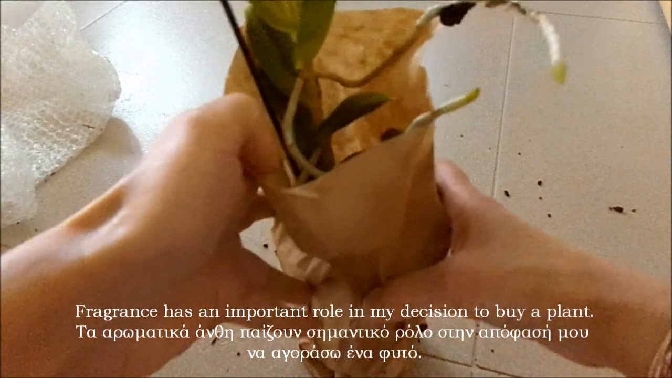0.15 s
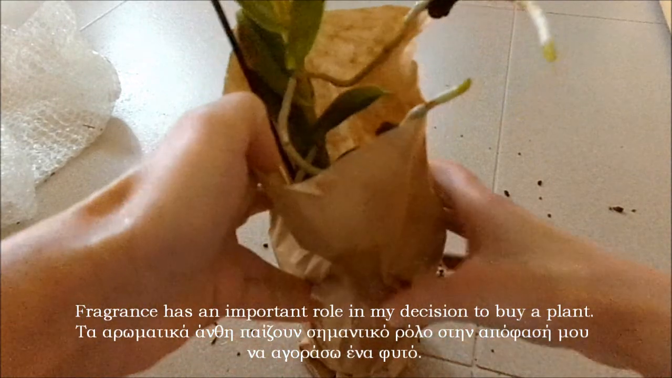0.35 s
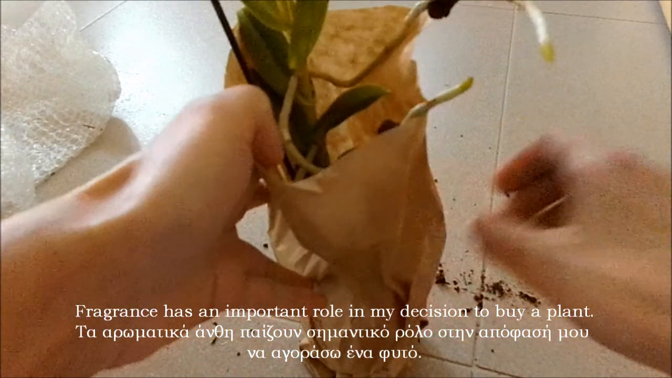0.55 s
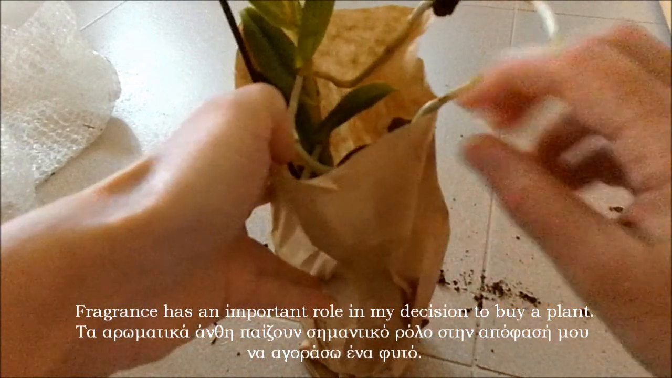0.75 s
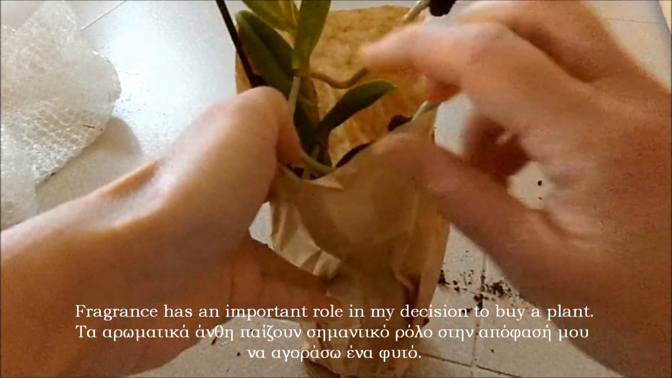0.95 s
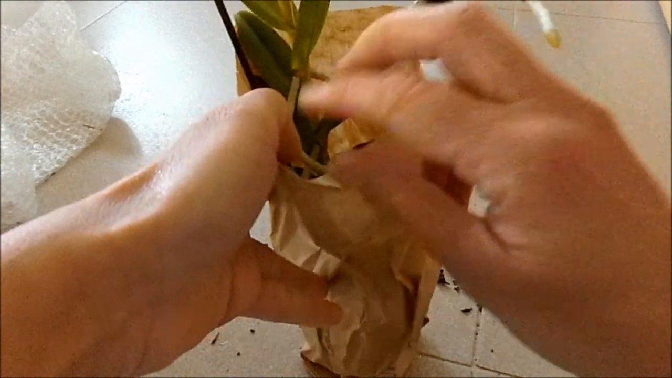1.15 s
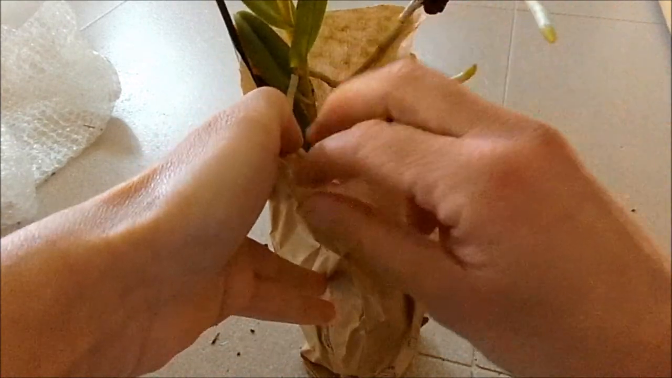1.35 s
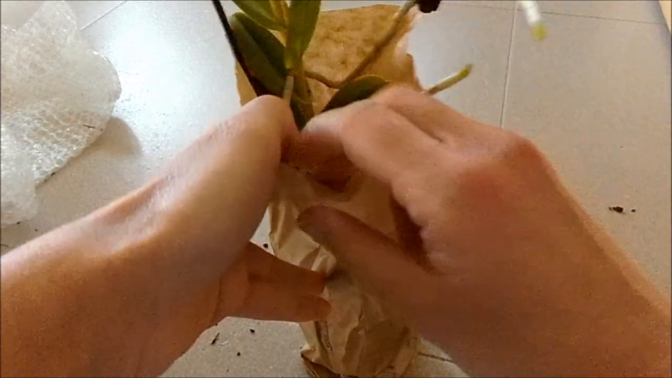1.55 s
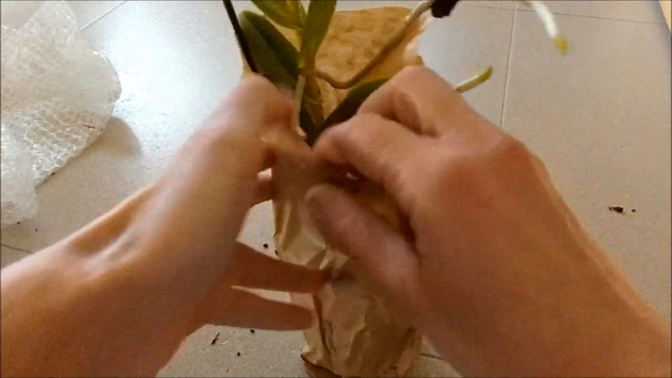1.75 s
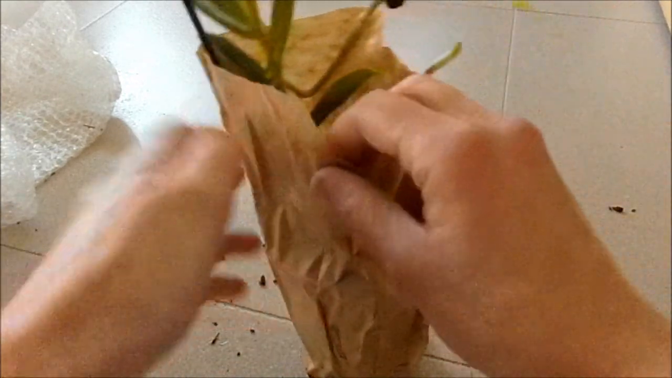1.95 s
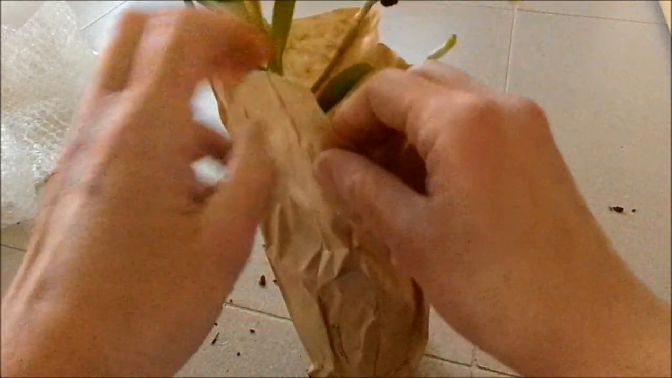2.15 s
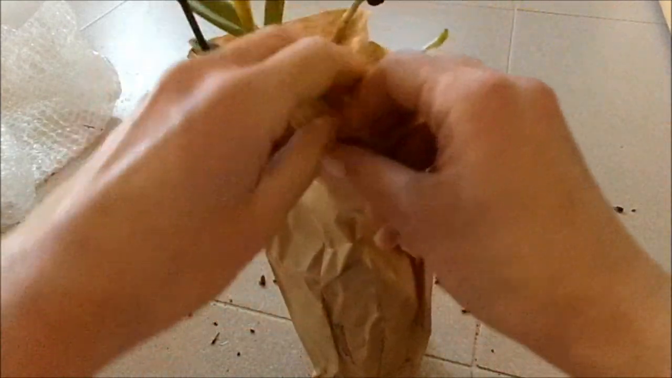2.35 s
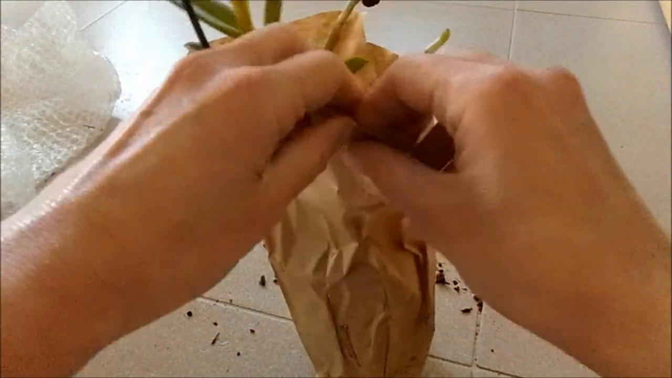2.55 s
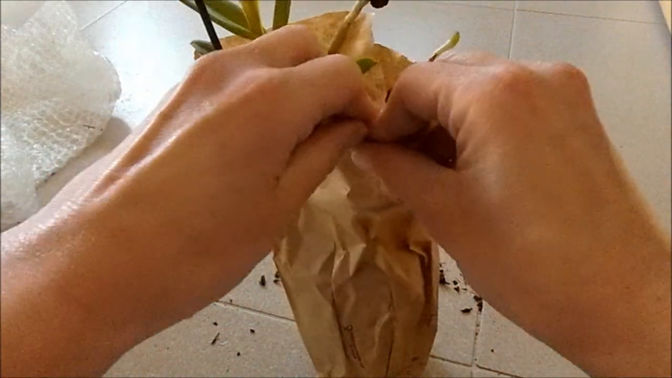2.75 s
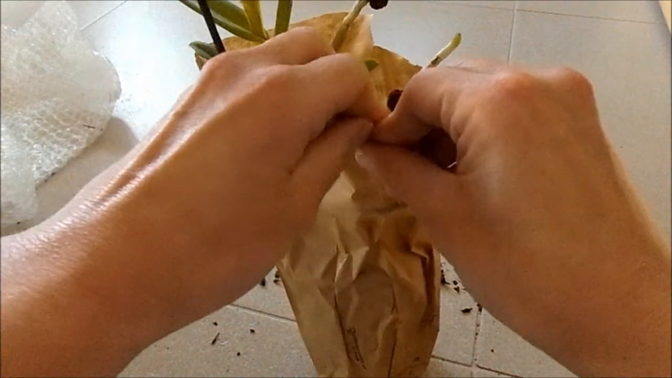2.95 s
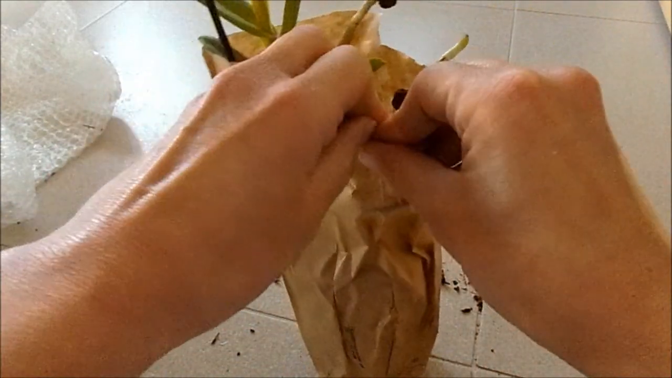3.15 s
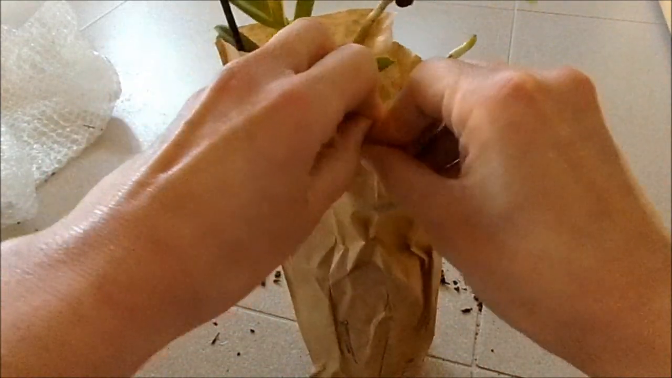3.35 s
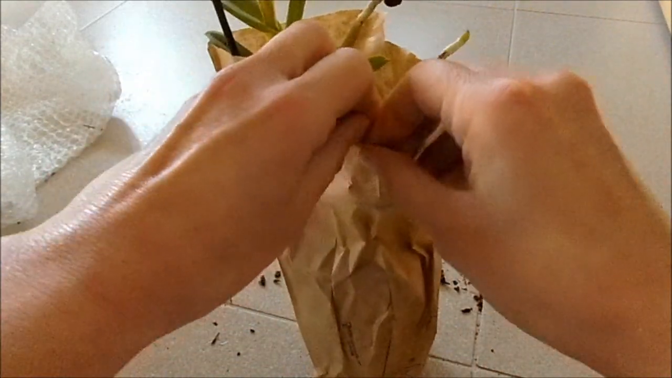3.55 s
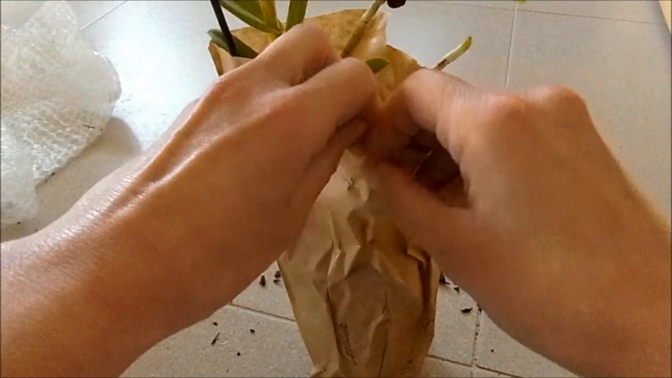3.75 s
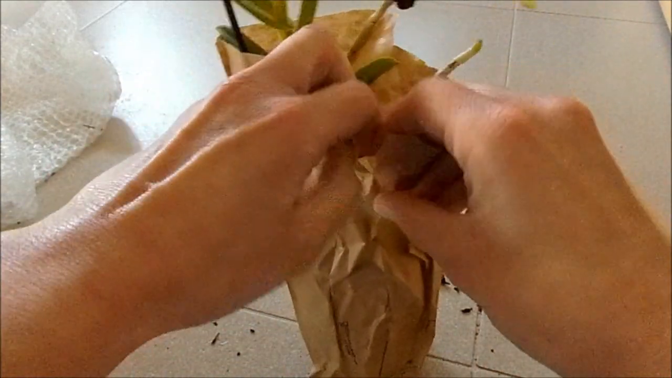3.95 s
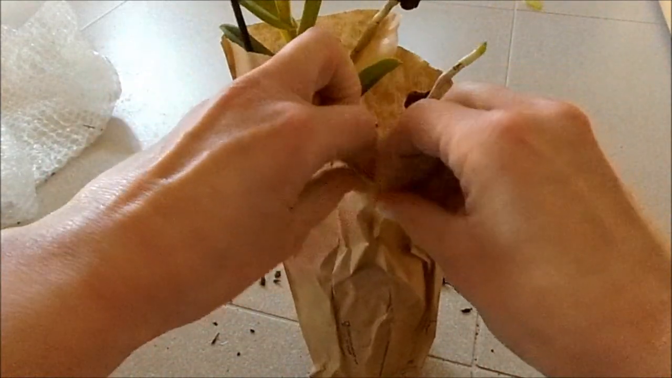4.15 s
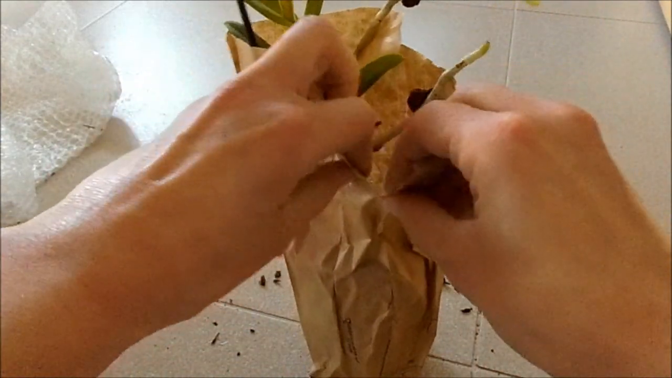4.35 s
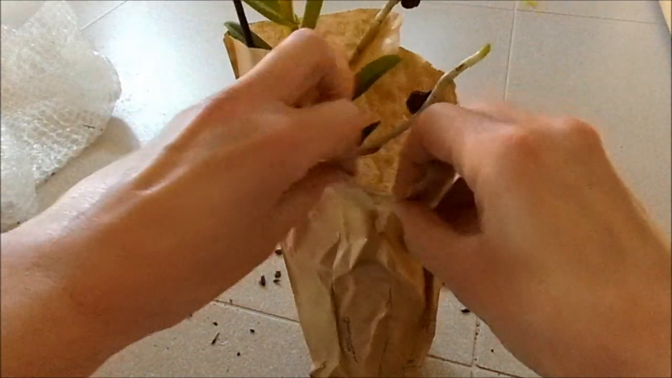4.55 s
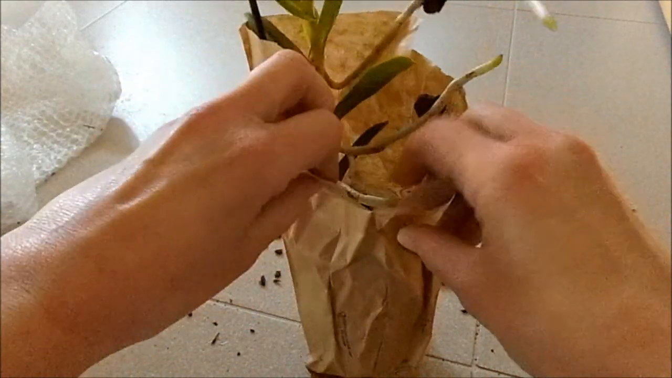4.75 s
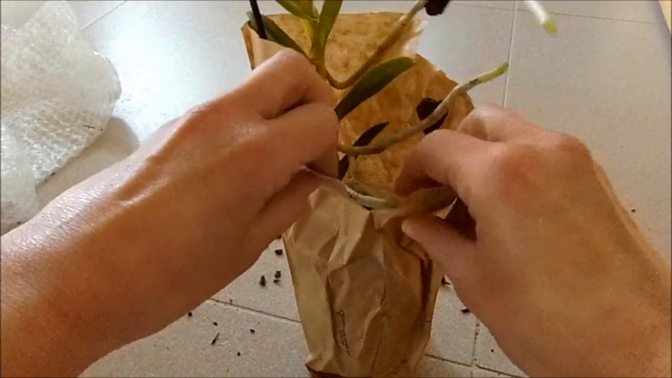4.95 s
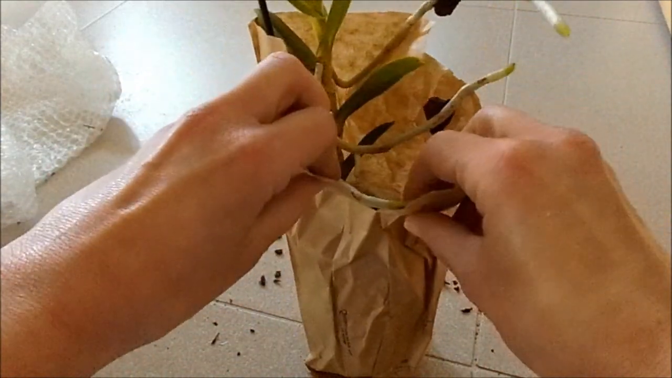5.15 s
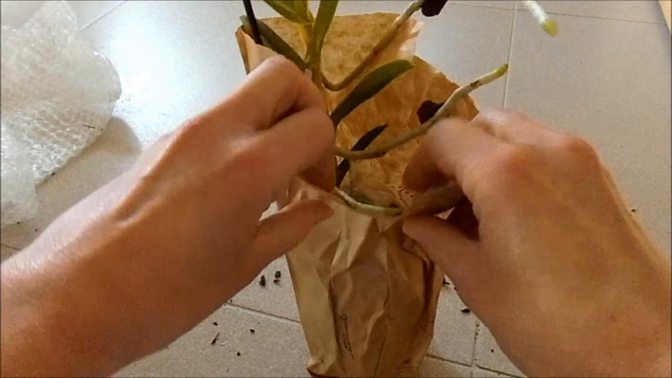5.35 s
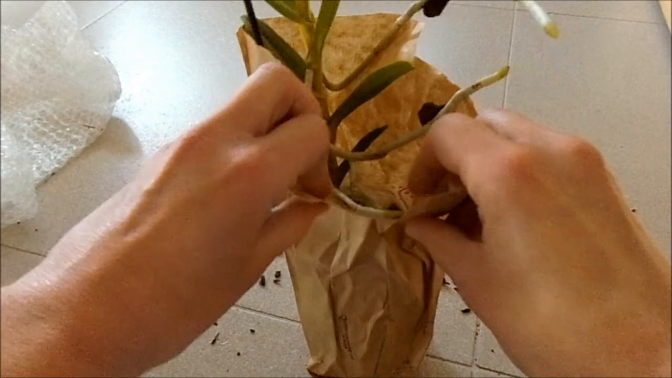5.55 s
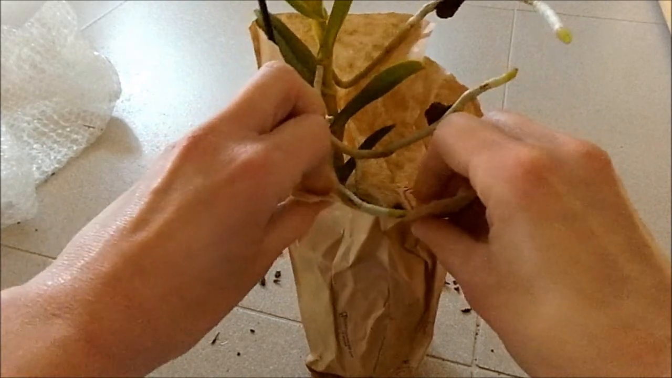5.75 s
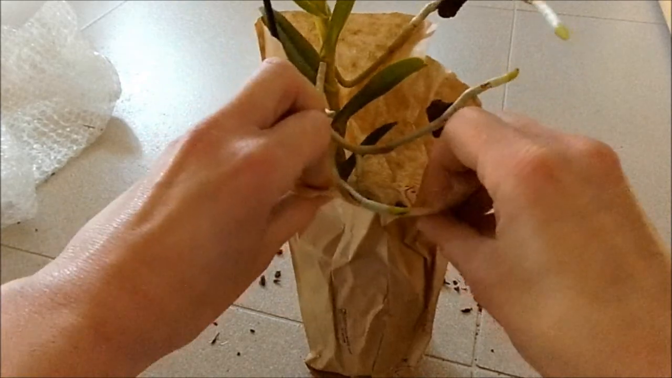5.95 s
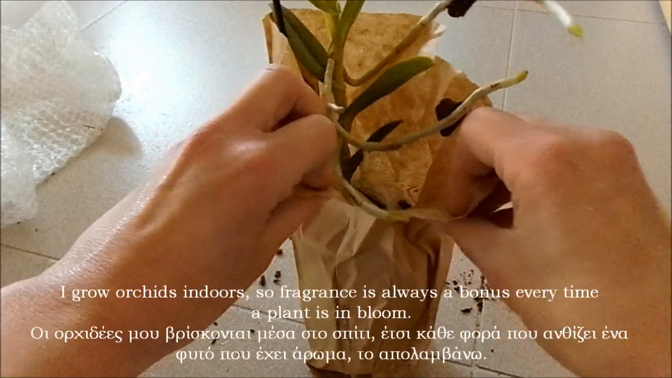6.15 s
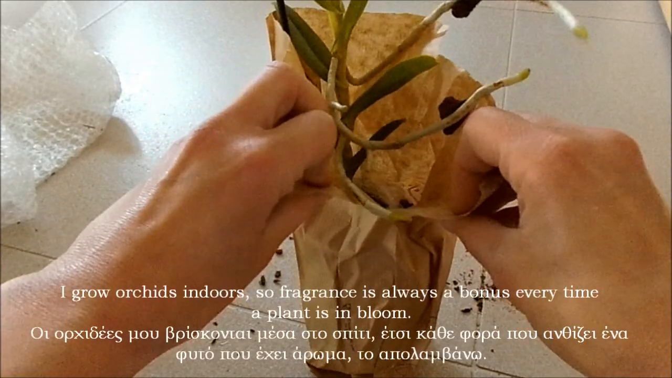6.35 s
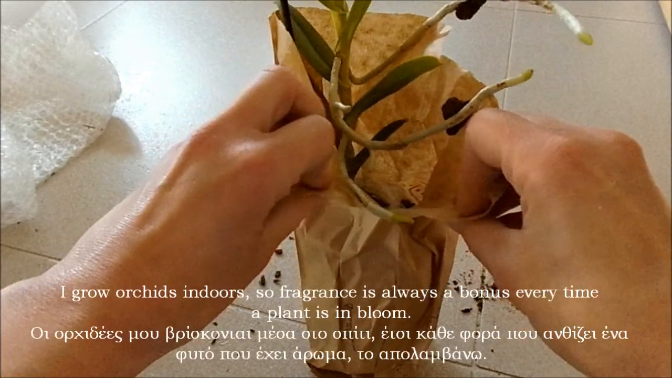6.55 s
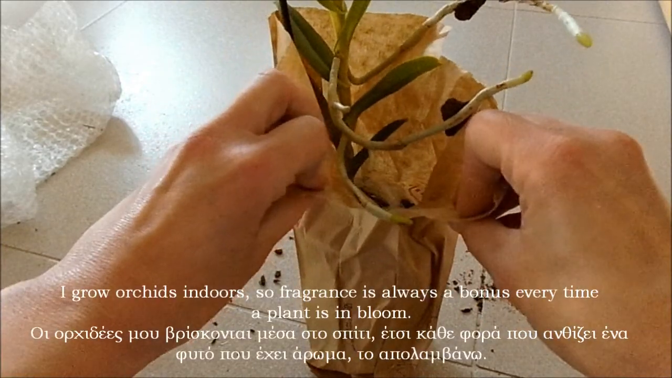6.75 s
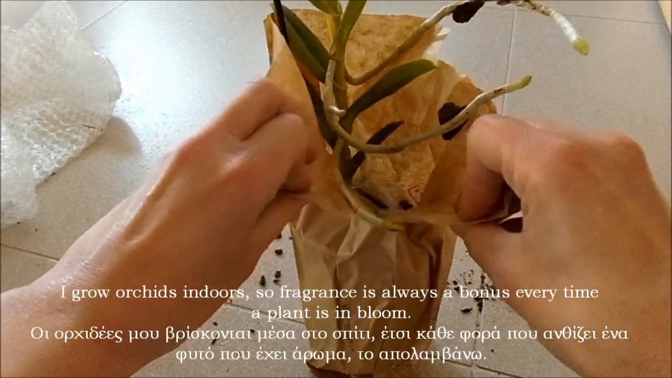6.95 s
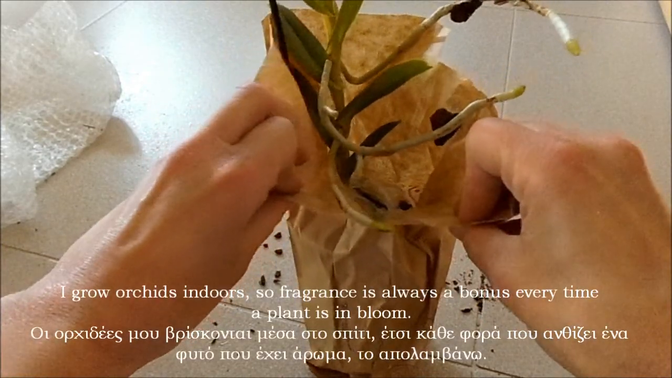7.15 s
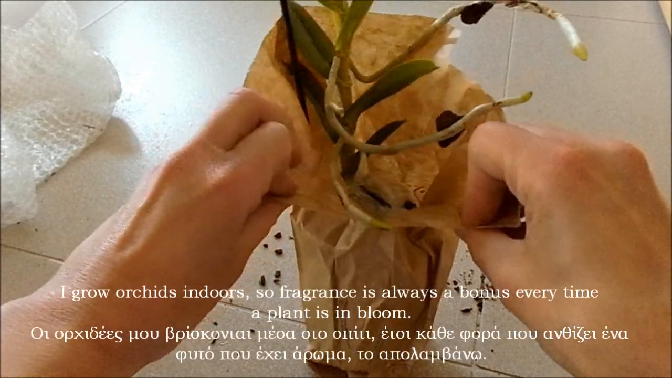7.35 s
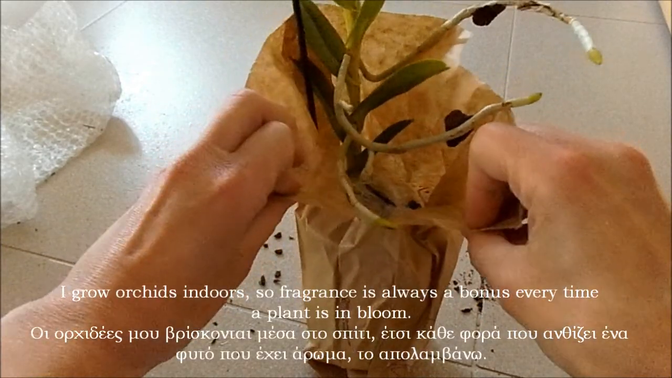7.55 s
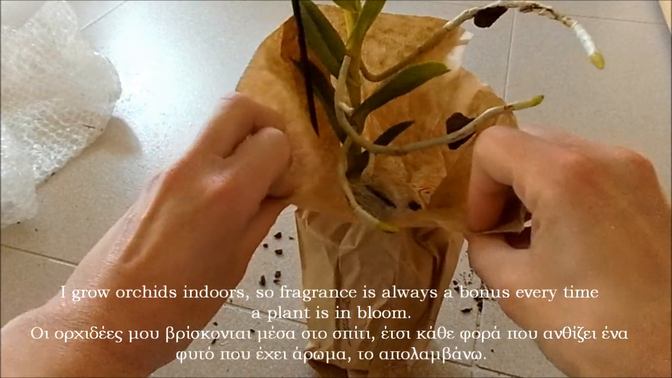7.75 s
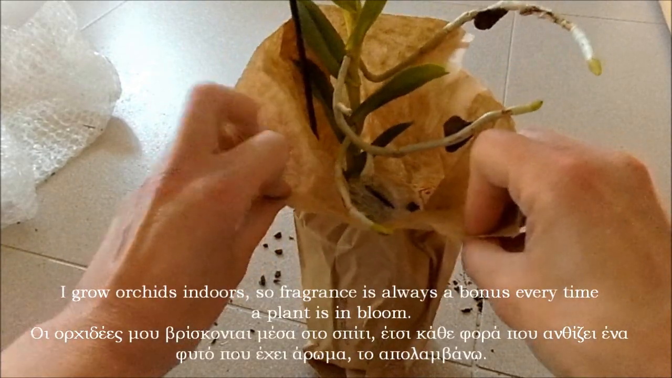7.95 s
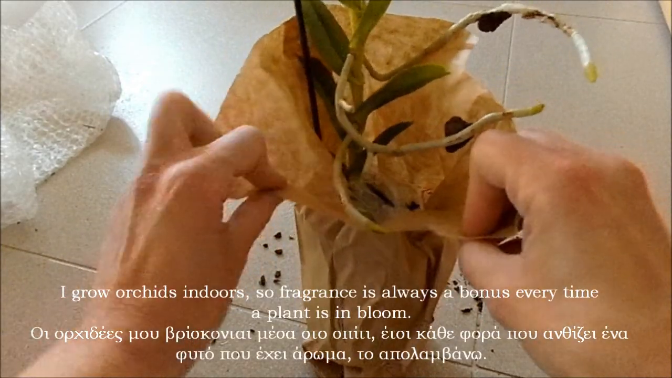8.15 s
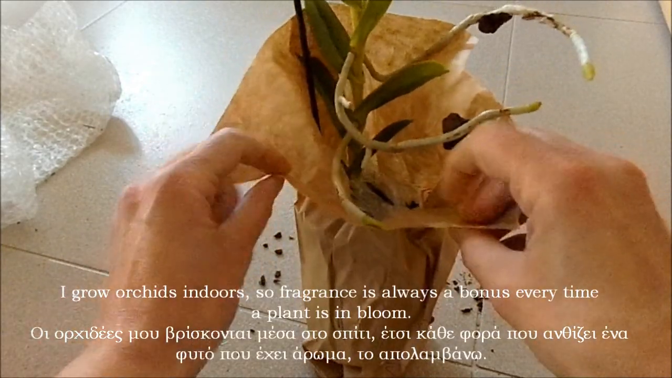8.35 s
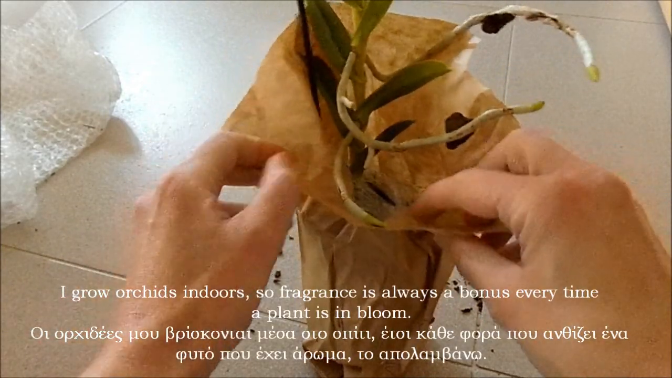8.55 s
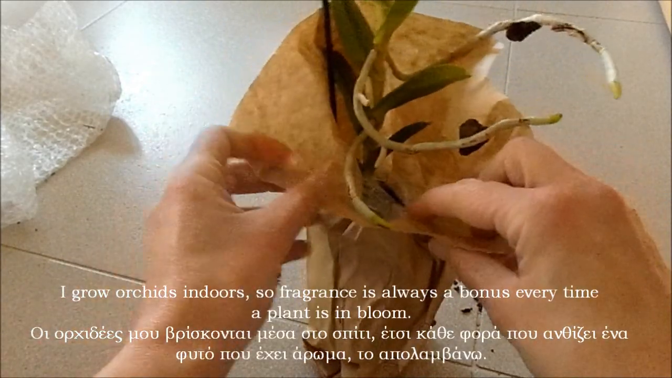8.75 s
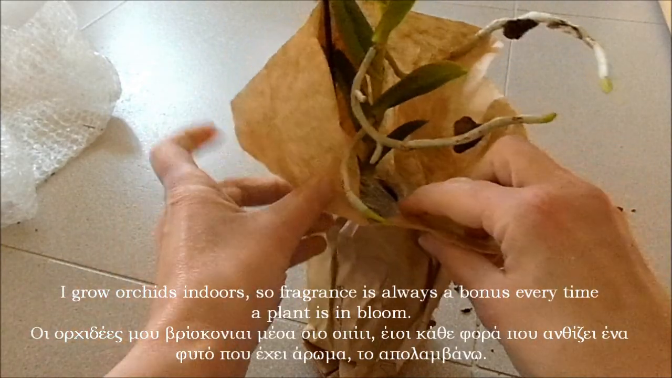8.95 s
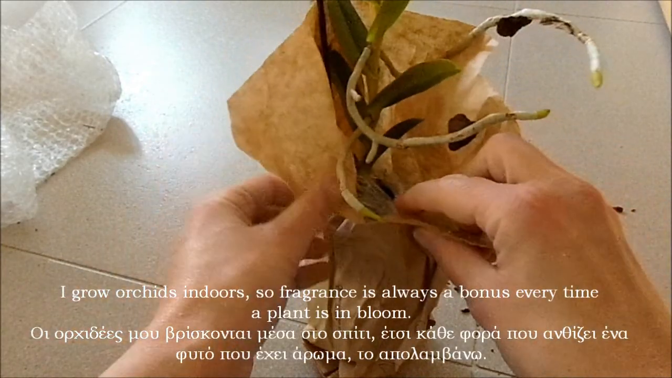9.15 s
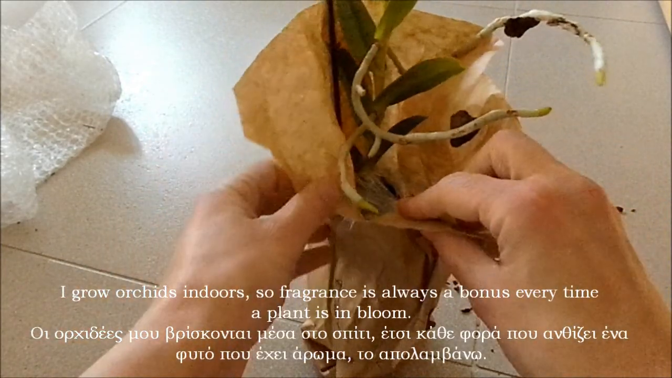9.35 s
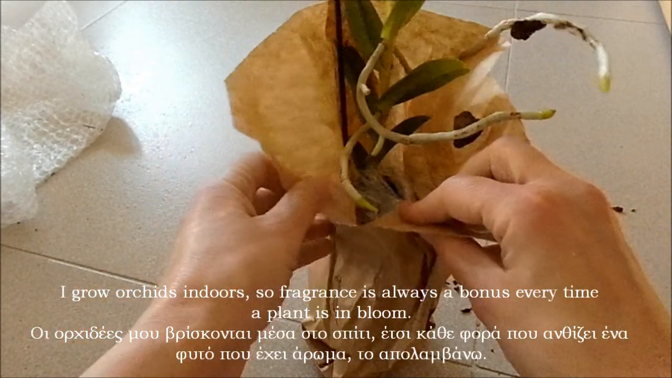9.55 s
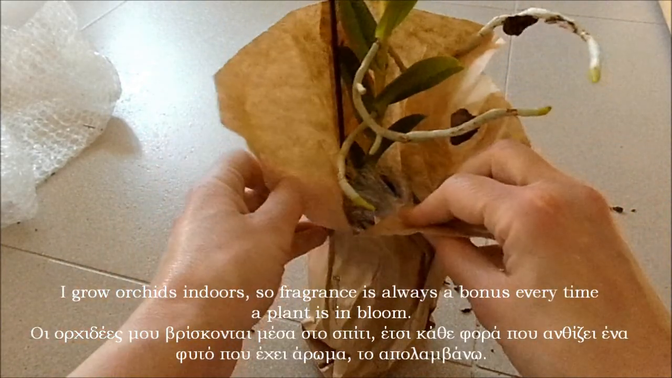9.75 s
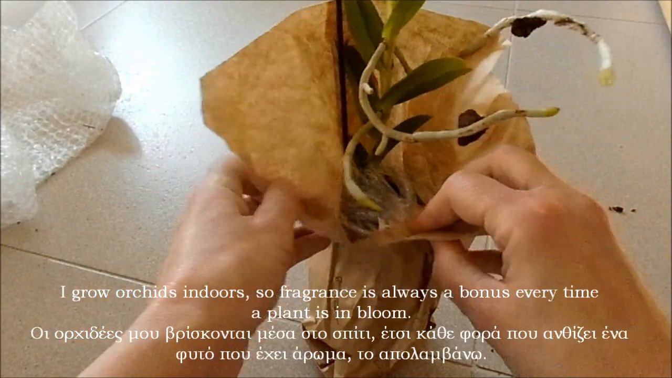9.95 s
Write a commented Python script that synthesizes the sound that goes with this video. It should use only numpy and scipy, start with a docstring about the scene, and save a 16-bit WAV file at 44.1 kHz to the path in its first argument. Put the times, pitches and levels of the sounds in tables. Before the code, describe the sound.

Fingers rub and flex stiff wrapping paper around a plant, softly at first, with a dry hiss and a few pops. Then comes a long string of small, sharp rips mixed with dense crinkling, louder than the opening. The paper is very near the microphone, with a short echo from the tiled room, while a barely audible low hum comes and goes far away in the second half.

```python
"""A quiet tiled room, a small camera's microphone close to two hands and a stiff paper wrapper.
From the start skin slides on the sheet, panels pop and creases snap through, with a short echo off the tiles.
From 3 s the sheet rips in short jerks, each a dense run of fibre breaks, and the crumpling thickens.
Between 4.4 and 8.4 s a low hum swells now and then from far away, while the tearing goes on to the end.
Throughout, the recorder squashes the loudest peaks."""
import sys
import numpy as np
from scipy import signal
from scipy.fft import rfft, irfft, next_fast_len
from scipy.io import wavfile
from scipy.ndimage import uniform_filter1d, map_coordinates

SR = 44100
rng = np.random.default_rng(int(sys.argv[2]) if len(sys.argv) > 2 else 0)


def generate_wav(sig):
    """Save sig (samples, or channels by samples) to the path in sys.argv[1] as 16-bit PCM at SR."""
    pcm = np.round(np.clip(np.atleast_2d(sig).T, -1, 1) * 32767).astype(np.int16)
    wavfile.write(sys.argv[1], SR, pcm)


N = 441000


def amp(db):
    """Gain of a level in dB."""
    return 10 ** (np.asarray(db) / 20)


def unit(x):
    """x at rms 1."""
    return x / np.sqrt(np.mean(x ** 2) + 1e-20)


def along(points, hz):
    """Read (freq_hz, value) points at hz, on a log frequency axis."""
    freqs, values = np.transpose(points)
    return np.interp(np.log(hz + 1), np.log(freqs + 1), values)


def curve(points):
    """Join (time_s, value) points into one value per sample."""
    return np.interp(np.arange(N) / SR, *np.transpose(points))


def wobble(knots_per_s):
    """A smooth random curve."""
    return map_coordinates(rng.standard_normal(N // 100), [np.arange(N) * knots_per_s / SR])


def coloured(x, spectrum):
    """x through a causal filter of the given spectrum that keeps white noise at its level."""
    gain = np.maximum(amp(along(spectrum, np.fft.rfftfreq(16384, 1 / SR))), 1e-4)
    cepstrum = irfft(np.log(gain))
    cepstrum[1:8192] *= 2  # fold onto positive time: minimum phase
    cepstrum[8193:] = 0
    pulse = irfft(np.exp(rfft(cepstrum)))
    return signal.fftconvolve(x, pulse / np.linalg.norm(pulse))[:N]


def patchy(spread_db):
    """Noise whose colour changes from moment to moment, as each crease rings differently."""
    spectra = signal.stft(rng.standard_normal(N + 512), nperseg=256)[2]
    patches = uniform_filter1d(rng.standard_normal(spectra.shape), size=11, axis=0)
    patches = unit(uniform_filter1d(patches, size=5, axis=1))
    return unit(signal.istft(spectra * amp(spread_db * patches), nperseg=256)[1][:N])


def breaks(per_s, spread_db, t60_s):
    """Envelope, at rms 1, of random fibre breaks; a positive spread makes a few much larger."""
    chance, size = rng.random((2, N))
    kicks = (chance < per_s / SR) * amp(-2 * spread_db * np.log(np.maximum(size, .01)))
    power = signal.lfilter([1], [1, -amp(-120 / (t60_s * SR))], kicks)
    return unit(np.sqrt(power))


def bursts(start_s, hold_s, level_db, t60_s):
    """Envelope of short events summed in power: a sudden start, a hold, then an exponential fall."""
    t = np.arange(int((hold_s.max() + 1.5 * t60_s) * SR) + 2) / SR
    falling_s = np.maximum(t - hold_s[:, None], 0)
    power = amp(level_db[:, None] - 60 * falling_s / t60_s) ** 2
    samples = np.round(start_s * SR).astype(int)[:, None] + np.arange(len(t))
    return np.sqrt(np.bincount(samples.ravel(), power.ravel(), N + SR)[:N])


# Colour of the quiet room at the microphone: freq_hz, relative_db
AIR_SPECTRUM = [(12, -24), (20, 8), (169, 2.5), (1020, -5.5), (1280, -2.5), (2120, -13), (3060, -11),
                (4160, -34), (11500, -59), (15200, -39), (16500, -44)]


def room_tone():
    """Faint, steady, low noise all around the microphone."""
    return amp(-60) * coloured(rng.standard_normal(N), AIR_SPECTRUM)


# Rustle of the hands holding the wrapper, close up: time_s, level_db
HANDLING = [(0, -64), (.67, -60.5), (1.06, -63), (2.01, -62.5), (2.78, -58.5), (2.95, -66), (3.3, -54),
            (3.8, -54), (3.92, -60), (4.26, -48), (4.6, -49), (5.12, -58), (5.61, -62.5), (6.23, -54.5),
            (6.55, -55.5), (7.22, -46), (7.34, -53.5), (7.75, -49.5), (8.24, -50), (8.92, -49.5),
            (8.99, -57), (9.25, -51)]
# Fingers sliding along the sheet: start_s, length_s, level_db
SLIDES = [(0, 0.021, -49), (0.106, .05, -47), (0.177, 0.059, -45), (1.141, 0.028, -54), (1.425, .08, -53),
          (1.512, .3, -46.5), (2.27, 0.057, -46.5), (2.386, .12, -54.5), (3.825, 0.025, -46),
          (6.355, 0.084, -49), (8.66, 0.11, -44), (9.051, 0.02, -43), (9.284, 0.68, -47.5)]


def grip_db():
    """Level of the rustle: the steady handling, or a slide where that is louder."""
    press_db_per_s, lift_db_per_s = 300, 356
    t = np.arange(N) / SR
    level_db = curve(HANDLING)
    for start_s, length_s, slide_db in SLIDES:
        press_db = press_db_per_s * (start_s - t).clip(0)
        lift_db = lift_db_per_s * (t - start_s - length_s).clip(0)
        level_db = np.maximum(level_db, slide_db - press_db - lift_db)
    return level_db


# Colour of skin on paper, close up: freq_hz, relative_db
SKIN_SPECTRUM = [(120, -38), (200, -1.5), (503, -7), (1270, -4), (1640, -1.5), (12100, -5.5), (15600, -18),
                 (16500, -9)]


def sliding_skin(rustle_db):
    """Skin rubs over the sheet with a scratchy, uneven hiss."""
    scratch = breaks(per_s=1500, spread_db=1.5, t60_s=.02)
    hiss = amp(rustle_db + 1.1 * wobble(25)) * scratch * patchy(spread_db=1.6)
    return coloured(hiss, SKIN_SPECTRUM)


# Colour of breaking fibres, close up: freq_hz, relative_db
CRACK_SPECTRUM = [(1470, -57), (2500, -20.5), (6010, -17), (9490, -2), (14300, -5.5), (16100, -11),
                  (16500, -29)]
# Colour of the flexing sheet: freq_hz, relative_db
SHEET_SPECTRUM = [(59, -31), (100, -17.5), (957, -8), (1350, -4.5), (1930, -2.5), (3010, -1), (5000, -9.5),
                  (6500, -41), (11000, -120)]
# The fine, bright part of the rustle: time_s, over_rustle_db
SHEEN_LEVEL = [(2.7, -15), (3, 0), (3.9, 7.5), (4.3, -29), (8.8, -38), (9.3, -9)]


def small_creases(rustle_db):
    """Small creases tick, some bright and some dull, louder under a firmer grip."""
    ticks = amp(rustle_db - 8) * breaks(per_s=40 * amp(4 * wobble(6)), spread_db=2.5, t60_s=.008)
    sheen = amp(rustle_db + curve(SHEEN_LEVEL)) * breaks(per_s=170, spread_db=-2, t60_s=.012)
    dull = amp(rustle_db - 7.5) * breaks(per_s=16, spread_db=5, t60_s=.031)
    return (coloured((ticks + sheen) * patchy(spread_db=3), CRACK_SPECTRUM)
            + coloured(dull * patchy(spread_db=3), SHEET_SPECTRUM))


# Panels popping through near the microphone, pitched by their size: start_s, level_db, pitch_hz
PANEL_POPS = [(0.0311, -10, 2700), (1.025, -33.5, 710), (2.59, -18.5, 2270), (2.66, -9, 2180),
              (4.535, -22.5, 920), (5.639, -27.5, 1270), (7.187, -33, 265), (7.497, -17.5, 816),
              (7.868, -35, 234), (9.445, -28.5, 252), (9.834, -16.5, 1080)]


def panel_pops():
    """Each panel swings out in half a cycle and rings for a few more, with a weaker partial below."""
    out, t = np.zeros(N + SR), np.arange(SR // 10) / SR
    t60_cycles = 11
    for start_s, level_db, pitch_hz in PANEL_POPS:
        cycles = pitch_hz * t
        ring = np.sin(2 * np.pi * cycles) + .25 * np.sin(2 * np.pi * .56 * cycles)
        envelope = amp(level_db - 60 * cycles / t60_cycles) * (1 - np.exp(-2 * cycles))
        out[round(start_s * SR):][:len(t)] += envelope * ring
    return out[:N]


# Single creases snapping through, close up: start_s, crack_db, knock_over_crack_db
CREASE_SNAPS = [(0.109, -49, 10), (0.302, -42.5, 3), (0.351, -58, 4), (0.6464, -65.5, 20.5),
                (0.901, -55, 8), (1.23, -50.5, 16), (1.379, -38, 6.5), (1.387, -32, -3), (1.6676, -37, 4.5),
                (2.108, -45.5, 14.5), (2.126, -49.5, 14), (2.245, -39, 3.5), (2.2528, -46, 8.5),
                (2.32, -31.5, 10.5), (2.359, -46, 5), (2.3768, -23, -2), (2.436, -42.5, -1),
                (2.6629, -41, 9), (2.755, -46, -25), (2.7714, -38, -34), (3.009, -40, -25),
                (3.041, -40, -33), (3.0876, -36, -38), (3.0932, -32, -14), (3.295, -25, -42),
                (3.329, -23.5, -14), (3.3622, -24, -21), (3.3789, -23, -24.5), (3.478, -28.5, -1),
                (3.64, -28.5, 6.5), (3.6972, -33, -2), (3.7292, -25, -1), (3.762, -25.5, -27),
                (3.773, -34, -18), (3.866, -28, -8), (3.976, -27, -5), (3.9985, -19.5, -4),
                (4.297, -24, -2), (4.3653, -30, -14), (4.458, -18, -4.5), (4.5307, -20, -1.5),
                (4.7074, -26, -7), (4.864, -13.5, -5.5), (4.912, -35, -18), (5.2015, -35, 2.5),
                (5.301, -37.5, -28), (5.4165, -29.5, 10), (5.5258, -70, 18), (5.647, -30.5, -11),
                (5.6603, -28.5, -29), (5.692, -26, -21), (5.811, -50.5, 12.5), (5.858, -35, -21),
                (5.888, -26, -14.5), (5.912, -36, -15), (6.0522, -31, -12), (6.067, -34, -7.5),
                (6.3487, -23.5, -19), (6.381, -24, -11.5), (6.405, -26, -25), (6.42, -26.5, -10),
                (6.446, -19.5, -19), (6.4638, -28.5, -5), (6.508, -28, -14), (6.5461, -21.5, -5.5),
                (6.5815, -34, -13), (6.624, -23.5, -7.5), (6.739, -28, -8), (6.747, -19, -12.5),
                (6.7728, -28, -7), (6.798, -32.5, -5), (6.8261, -26, -4.5), (6.905, -36, -2.5),
                (6.962, -35, -13), (6.9854, -21, -12), (6.9987, -24, -16), (7.0152, -26.5, -11),
                (7.0254, -22.5, -7.5), (7.1337, -25.5, -7), (7.1782, -46, 7.5), (7.191, -31.5, 7.5),
                (7.207, -33, 0), (7.2185, -28, -17), (7.234, -28, -12), (7.4103, -27.5, -5.5),
                (7.5348, -33.5, 3.5), (7.579, -26.5, -13), (7.7093, -19, -31), (7.7364, -25, -25),
                (7.801, -44.5, 3.5), (7.8643, -32, 9.5), (7.925, -37, -22), (8.033, -35, -8),
                (8.2713, -43, -21), (8.3255, -31, -7.5), (8.3941, -31.5, -4.5), (8.481, -41.5, -0.5),
                (8.5438, -45, 12), (8.6352, -22.5, -13), (8.7293, -29, -10), (8.7906, -32.5, -2.5),
                (9.1546, -35.5, 3), (9.1748, -33, -6.5), (9.4083, -15, -28), (9.769, -25, -16.5),
                (9.802, -36, -3), (9.9596, -28, -8)]
# Short rips of the sheet, just as close: start_s, length_s, crack_db, knock_over_crack_db
SHEET_RIPS = [(2.963, 0.041, -49, -14), (3.102, 0.051, -36, -12), (3.154, 0.035, -20, -31),
              (3.24, 0.014, -29.5, -25), (3.302, 0.016, -27.5, -12.5), (3.3994, .009, -26, -11.5),
              (3.426, .01, -30.5, -24), (3.526, 0.04, -28.5, -11), (3.581, 0.055, -25.5, -7.5),
              (3.66, 0.025, -25, -7), (3.984, 0.071, -26.5, -10.5), (4.09, 0.041, -28.5, -17),
              (4.137, 0.084, -24, -4.5), (4.3928, 0.062, -18.5, -8.5), (4.467, 0.039, -21, -4),
              (4.57, .013, -38, -5), (5.7726, 0.03, -50.5, 4), (5.941, 0.046, -23, -8),
              (5.991, .044, -27.5, -7.5), (6.657, 0.014, -20.5, -8.5), (6.7, 0.034, -26.5, -7.5),
              (6.8861, 0.0066, -18.5, -8.5), (7.054, 0.036, -26, -7.5), (7.109, 0.019, -30, -13),
              (7.3542, 0.0095, -27, -6), (7.472, 0.041, -25.5, -7), (7.607, .011, -25, -9),
              (7.6337, 0.016, -33.5, -9.5), (7.97, 0.052, -25.5, -13), (8.766, 0.013, -37.5, 1),
              (9.308, 0.044, -32, -11), (9.368, 0.097, -26, -9.5), (9.4755, .017, -25, -8),
              (9.52, 0.027, -22, -10), (9.5635, 0.058, -20.5, -12.5), (9.658, 0.057, -24.5, -13),
              (9.826, 0.047, -19.5, -13), (9.8843, 0.0077, -24, -6.5)]
# Colour of the paper beside the break: freq_hz, relative_db
EDGE_SPECTRUM = [(1500, -30.5), (3400, -1), (4200, -0.5), (5000, -1), (8000, 0.5), (14000, -18)]


def snaps_and_rips():
    """Fibres crack brightly, break by break; a heavy jerk also shakes the edge and knocks the sheet."""
    snap_s, snap_db, snap_knock_db = np.transpose(CREASE_SNAPS)
    rip_s, rip_length_s, rip_db, rip_knock_db = np.transpose(SHEET_RIPS)
    snap_length_s = np.maximum(.003 + .00004 * snap_knock_db, 0)  # a harder knock lasts longer
    stick_slip = unit(amp(1.56 * wobble(55)))
    run = breaks(per_s=480, spread_db=3.2, t60_s=.009)
    start_s = np.r_[snap_s, rip_s]
    zeros = np.zeros_like(start_s)
    first_break = bursts(start_s, hold_s=zeros, level_db=zeros, t60_s=.015)
    fibres = np.sqrt(run ** 2 + amp(5.5) * first_break ** 2)

    def layer(spectrum, knock_share, t60_s):
        """All snaps and rips in one colour, with a share of their knock level."""
        snaps = bursts(snap_s, snap_length_s, snap_db + knock_share * snap_knock_db, t60_s)
        rips = stick_slip * bursts(rip_s, rip_length_s, rip_db + knock_share * rip_knock_db, t60_s)
        return coloured(np.hypot(snaps, rips) * fibres * patchy(spread_db=4), spectrum)

    crack = layer(CRACK_SPECTRUM, knock_share=0, t60_s=.006)
    edge = layer(EDGE_SPECTRUM, knock_share=.52, t60_s=.0092)
    knock = layer(SHEET_SPECTRUM, knock_share=1, t60_s=.01)
    return crack + edge + knock


# Ring of the tiled room around the hands: freq_hz, t60_s
TILE_DECAY = [(300, 0.58), (3000, 0.23), (12000, 0.17)]


def tile_echo(paper):
    """The tiles throw the paper's sound back a moment later; the treble dies first."""
    hz, t, spectra = signal.stft(rng.standard_normal(SR // 2), SR, nperseg=256)
    decay = amp(-60 * t / along(TILE_DECAY, hz)[:, None])
    tail = signal.istft(spectra * decay, SR, nperseg=256)[1]
    delayed = np.pad(paper, (150, 0))
    return signal.fftconvolve(delayed, tail / np.linalg.norm(tail))[:N]


# Swells of a hum far from the microphone: start_s, length_s, pitch_hz, level_db
HUM_SWELLS = [(4.397, 0.56, 43, -60), (4.553, 0.46, 104.6, -64), (5.45, 0.93, 44.1, -56),
              (6.552, 0.65, 84, -60.5), (7.2, 0.48, 80.5, -59.5), (8.195, .25, 48, -61)]


def far_hum():
    """Wavering low notes that fade in and out."""
    out, waver_hz = np.zeros(N), 2.4 * wobble(5.1)
    for start_s, length_s, pitch_hz, level_db in HUM_SWELLS:
        span = slice(round(start_s * SR), round((start_s + length_s) * SR))
        swell = np.sqrt(np.abs(np.sin(np.linspace(0, np.pi, span.stop - span.start))))
        phase = 2 * np.pi * np.cumsum(pitch_hz + waver_hz[span]) / SR
        out[span] += amp(level_db) * swell * np.sin(phase)
    return out


def scene():
    """At one microphone: room tone, the paper close up, its echo off the tiles and the hum far off."""
    rustle_db = grip_db()
    paper = snaps_and_rips() + panel_pops() + sliding_skin(rustle_db) + small_creases(rustle_db)
    return (room_tone() + paper + amp(-15) * tile_echo(paper) + far_hum())[None]


def record(dry):
    """The camera's recorder saturates softly on peaks and keeps nothing above its band limit."""
    ceiling, hardness, top_hz = .19, 3, 16000
    squashed = dry[0] / (1 + np.abs(dry[0] / ceiling) ** hardness) ** (1 / hardness)
    size = next_fast_len(N + SR // 2)
    in_band = np.fft.rfftfreq(size, 1 / SR) < top_hz
    return irfft(rfft(squashed, size) * in_band, size)[None, :N]


dry = scene()
out = record(dry)
generate_wav(out)
```